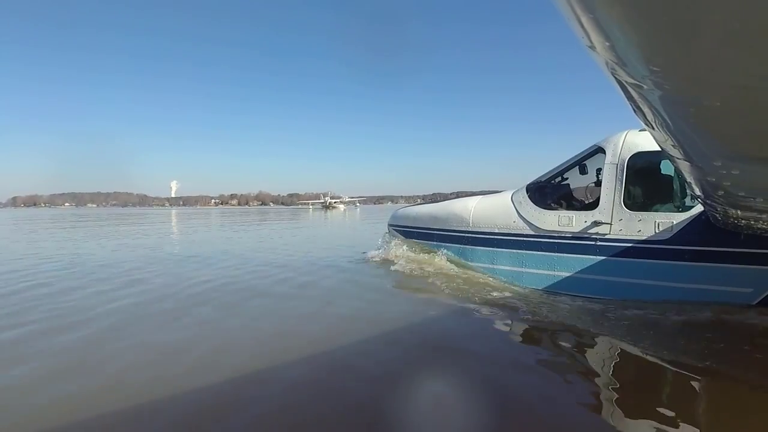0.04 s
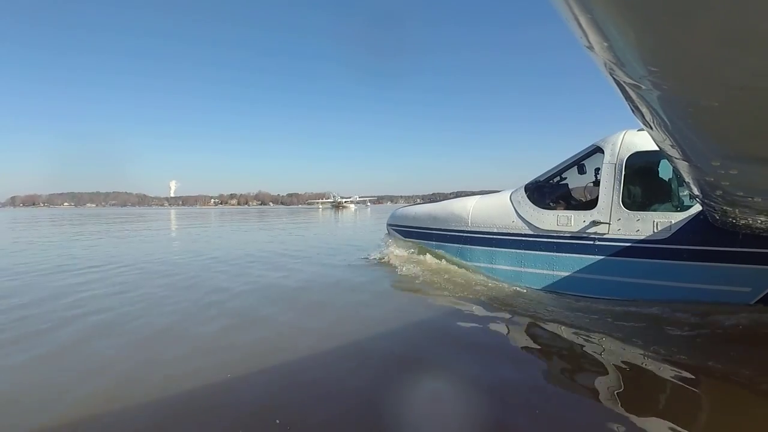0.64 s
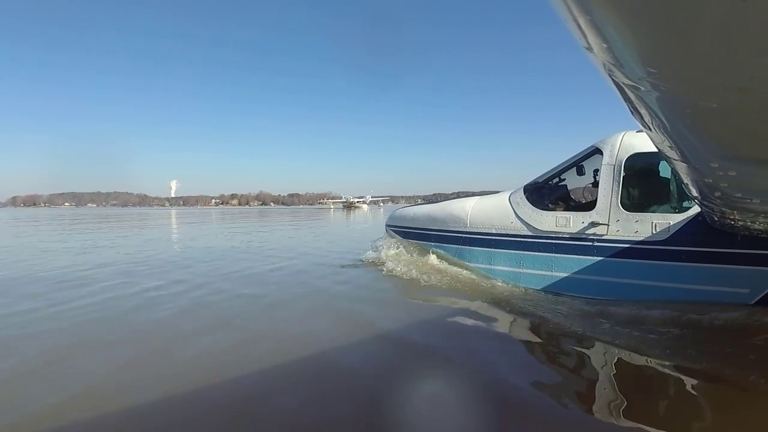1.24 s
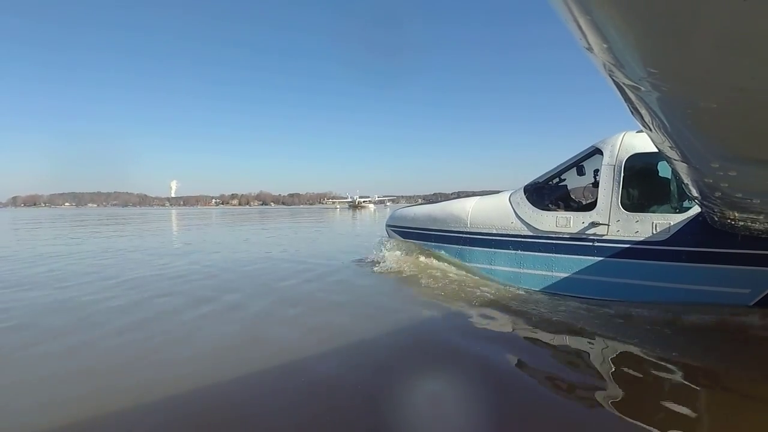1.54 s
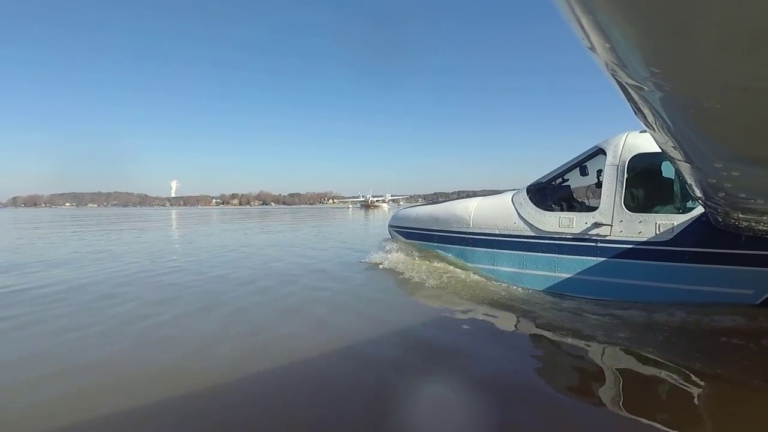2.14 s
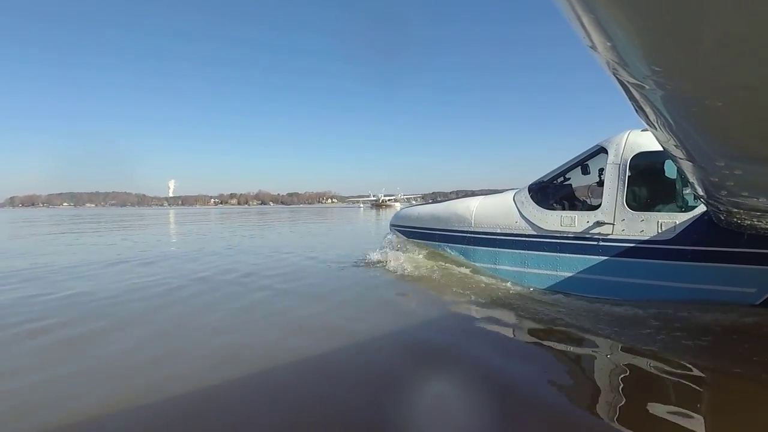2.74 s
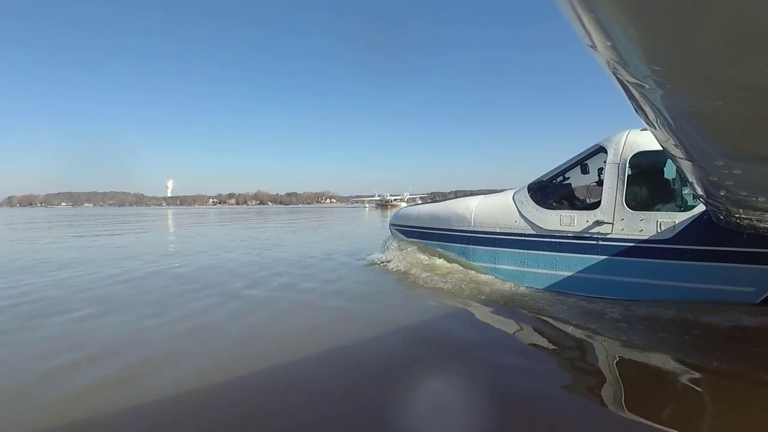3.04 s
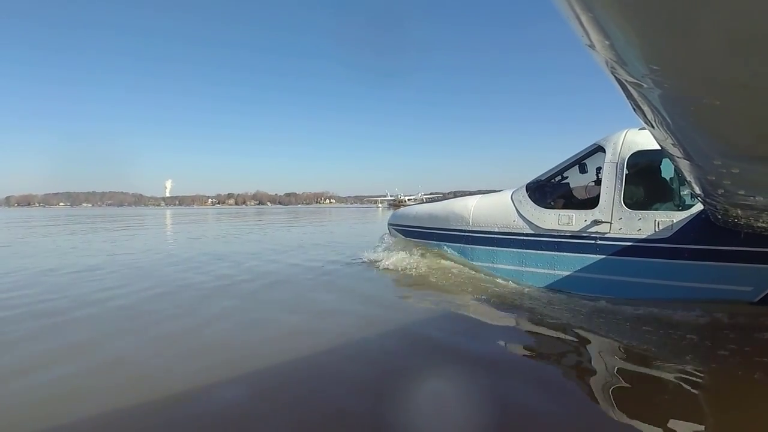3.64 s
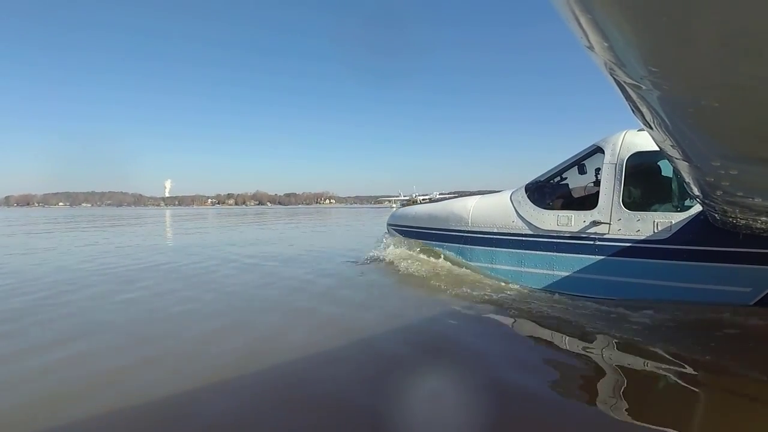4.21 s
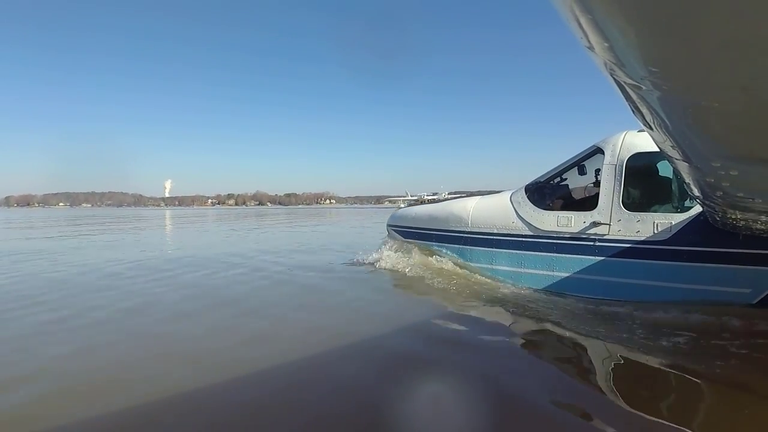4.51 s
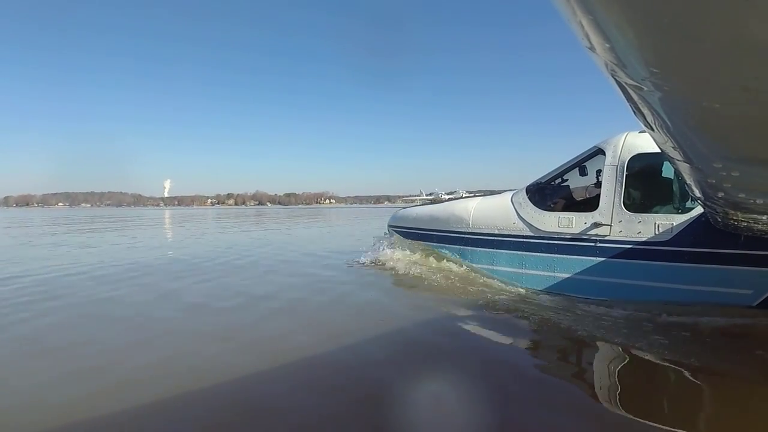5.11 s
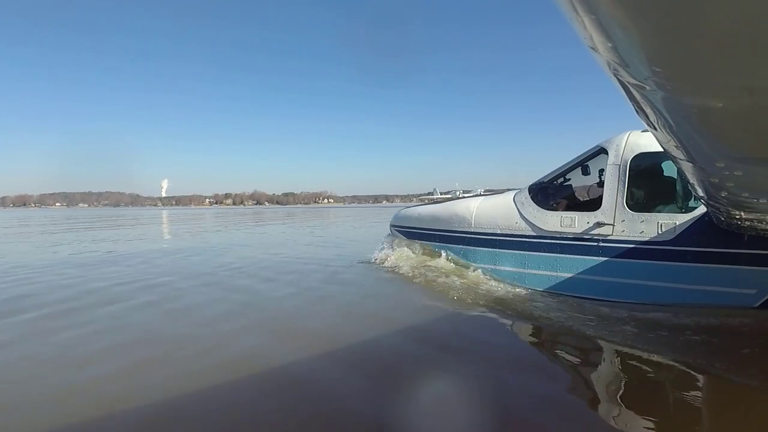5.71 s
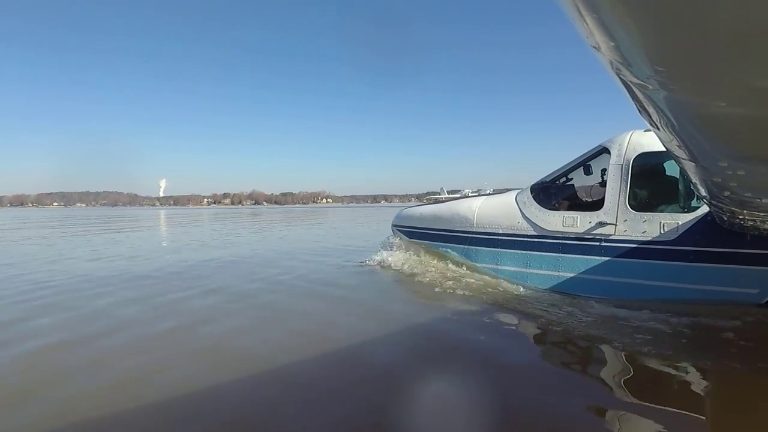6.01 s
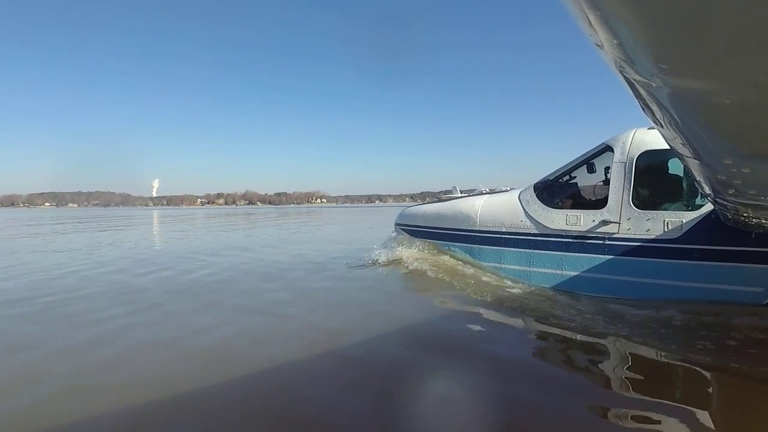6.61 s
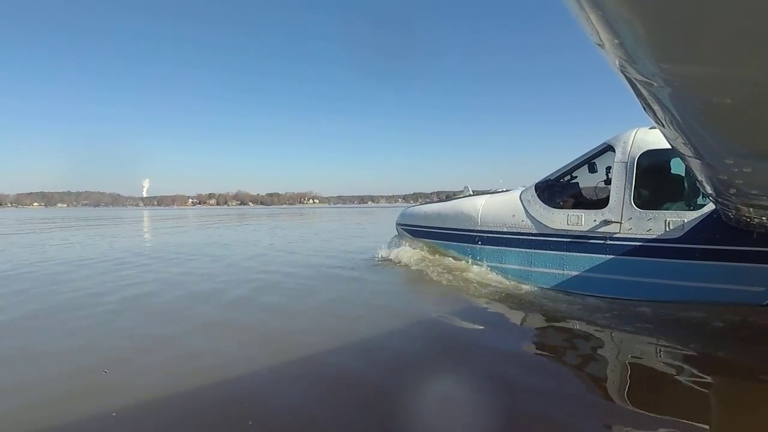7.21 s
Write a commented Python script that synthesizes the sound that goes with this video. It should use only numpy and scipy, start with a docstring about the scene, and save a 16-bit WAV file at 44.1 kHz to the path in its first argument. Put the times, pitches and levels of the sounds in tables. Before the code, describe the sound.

Close by, a seaplane's engine chugs at an even idle while the propeller beats the air. The low throb and rumble dominate from start to finish, with dry exhaust chuffs and a faint metallic hiss above them. Underneath, lake water bubbles against the moving hull and gives an occasional plop, swelling into a light splash just before the end. The microphone sits under the wing.

```python
"""A small seaplane's four-cylinder engine idles, heard from under the wing while taxiing across a lake.
The two-bladed propeller beats the air. Unequal cylinders make the engine lope; each gulps air, thumps
the silencer, rasps and spits a chuff that pings in the tailpipe, over rumble, ticks and metallic hiss.
The bow wave washes and bubbles along the hull, plops, gurgles and splashes up near the end."""
import sys
import numpy as np
from scipy import signal
from scipy.fft import rfft, irfft, next_fast_len
from scipy.io import wavfile
from scipy.ndimage import uniform_filter1d, map_coordinates

SR = 44100
rng = np.random.default_rng(int(sys.argv[2]) if len(sys.argv) > 2 else 0)


def wav_out(sig):
    """Save sig, one row per channel (or a flat mono array), as 16-bit PCM at SR to the path in sys.argv[1]."""
    wavfile.write(sys.argv[1], SR, np.round(np.clip(np.atleast_2d(sig).T, -1, 1) * 32767).astype(np.int16))


N = 324135


def amp(db):
    """Decibels to gain."""
    return 10 ** (np.asarray(db) / 20)


def unit(x):
    """x at rms 1."""
    return x / np.sqrt(np.mean(x ** 2) + 1e-20)


def wobble(rate_hz):
    """Smooth random curve, rate_hz knots a second."""
    knots = rng.standard_normal(int(N * rate_hz / SR) + 4)
    return map_coordinates(knots, [np.arange(N) * rate_hz / SR])


def swell(at_s, half_s):
    """Gaussian rise and fall."""
    return np.exp(-((np.arange(N) / SR - at_s) / half_s) ** 2)


def filtered(x, response):
    """x through a complex frequency response."""
    size = next_fast_len(N + SR // 2)
    return irfft(rfft(x, size) * response(np.fft.rfftfreq(size, 1 / SR)), size)[:N]


def coloured(x, spectrum):
    """x shaped by (f/Hz, level/dB) points on a log axis, rms 1."""
    hz, db = np.transpose(spectrum)
    return unit(filtered(x, lambda f: amp(np.interp(np.log(f + 1), np.log(hz), db))))


def noise(spectrum):
    """Coloured noise, rms 1."""
    return coloured(rng.standard_normal(N), spectrum)


def patchy(spectrum, depth_db):
    """Noise whose colour shifts from moment to moment, rms 1."""
    cells = signal.stft(rng.standard_normal(N), nperseg=512)[2]
    field = uniform_filter1d(rng.standard_normal(cells.shape), size=3, axis=0)
    field = uniform_filter1d(field, size=5, axis=1)
    mottled = signal.istft(cells * amp(depth_db * unit(field)), nperseg=512)[1]
    return coloured(mottled[:N], spectrum)


def body(f, modes):
    """Response of damped modes of alternating sign."""
    return sum((-1) ** k * amp(db) * 1j * f * width / (hz * hz - f * f + 1j * f * width)
               for k, (hz, width, db) in enumerate(modes))


def ringing(x, modes):
    """x through a set of modes."""
    return filtered(x, lambda f: body(f, modes))


def kicks(cycle, phase, db, scatter_db):
    """One impulse per engine cycle at this phase, scattered in size."""
    at = np.searchsorted(cycle, np.arange(-1, int(cycle[-1]) + 2) + phase)
    at = at[(at > 0) & (at < N)]
    return np.bincount(at, amp(db + scatter_db * rng.standard_normal(len(at))), N)


def puffs(impulses, rise_s, decay_s):
    """An envelope that swells and dies away after each impulse."""
    t = np.arange(SR // 10) / SR
    shape = (1 - np.exp(-t / rise_s)) ** 2 * np.exp(-t / decay_s)
    return signal.fftconvolve(impulses, shape / shape.max())[:N]


# Crankshaft: t/s, speed/rpm
SHAFT_SPEED = [(0.0, 939.2), (0.2, 937.2), (0.4, 943.4), (0.6, 944.7), (0.8, 936.5), (1.1, 943.5),
               (1.6, 949.3), (2.2, 948.3), (2.8, 944.3), (3.4, 943.5), (3.9, 942.9), (4.4, 935.5),
               (4.9, 947.4), (5.4, 944.0), (5.9, 948.5), (6.4, 949.2), (6.9, 949.1), (7.35, 959.4)]
def crankshaft():
    """Running count of engine cycles, two turns each."""
    rpm = np.interp(np.arange(N) / SR, *np.transpose(SHAFT_SPEED))
    return np.cumsum(rpm / 60 / 2) / SR - .053


# Blade-rate harmonics, from the first: level/dB
BLADE_HARMONICS = [-16, 1.5, -5.5, -36.5]
def propeller(cycle, lag_blades, unsteady_db):
    """Each passing blade leaves a smooth suction pulse: two blades, two turns a cycle."""
    blades = 2 * 2 * cycle - lag_blades
    return unit(-sum(amp(db + unsteady_db * wobble(16)) * np.cos(2 * np.pi * k * blades)
                     for k, db in enumerate(BLADE_HARMONICS, 1)))


# Cylinders in firing order: exhaust phase/cycle, level/dB, intake phase/cycle, level/dB
CYLINDER_PULSES = [(.96, 12.9, .923, 5.1), (.228, 13.4, .188, 16.2), (.478, 13.3, .393, 8.1),
                   (.772, 11.8, .667, 13.8)]
# Silencer and airbox modes: f/Hz, width/Hz, level/dB
SILENCER_MODES = [(93.2, 14, 2.8), (154, 14, 3.5), (202, 79, -12.6), (340, 19.6, -18.3)]
AIRBOX_MODES = [(143.9, 18, -1.1), (164, 19, 2.9)]
def lope(cycle, exhaust_db, intake_db, muffle_hz, scatter_db):
    """Even exhaust pulses ring the silencer, unequal gulps the airbox; together they chug once a cycle."""
    blows = sum(kicks(cycle, phase, db + exhaust_db, scatter_db) for phase, db, _, _ in CYLINDER_PULSES)
    gulps = sum(kicks(cycle, phase, db + intake_db, scatter_db) for _, _, phase, db in CYLINDER_PULSES)
    thumps = ringing(gulps, AIRBOX_MODES) - ringing(blows, SILENCER_MODES)
    return filtered(thumps, lambda f: 1 / (1 + (f / muffle_hz) ** 4))


# Exhaust valves: opening phase/cycle, chuff level/dB, rasp level/dB, knock phase/cycle, level/dB
EXHAUST_VALVES = [(.961, 3.2, 2, .945, 1), (.215, -12, -2, .207, -3.5), (.476, -1.5, 1, .452, 3),
                  (.712, 3.2, 0, .69, 0)]
# Cowling modes: f/Hz, width/Hz, level/dB
COWLING_MODES = [(280, 16, 1), (351, 7.6, -4.5), (574, 25, -4), (668, 29, 1.5), (707.6, 30, -3.5)]
# Gas in the pipe: f/Hz, level/dB
RASP_SPECTRUM = [(150, -19.5), (290, -1.5), (420, -2.5), (570, 0), (690, -1), (820, -5), (1120, -2),
                 (1380, -13), (1650, -8), (2200, -20.5), (5000, -24), (7500, -42), (8700, -29),
                 (12000, -47.5)]
def rasp(cycle, gas_db, cowling_db, knock_hz, scatter_db):
    """Each valve knocks the cowling as it lifts, then gas rasps through the pipe."""
    strokes = sum(kicks(cycle, phase, db, scatter_db) for phase, _, db, _, _ in EXHAUST_VALVES)
    lifts = sum(kicks(cycle, phase, db, scatter_db / 2) for _, _, _, phase, db in EXHAUST_VALVES)
    knocks = filtered(lifts, lambda f: 1 / (1 + 1j * f / knock_hz) ** 2)
    gas = unit(puffs(strokes, rise_s=0.0023, decay_s=0.025)) * patchy(RASP_SPECTRUM, depth_db=3.5)
    return amp(gas_db) * gas + amp(cowling_db) * unit(ringing(knocks, COWLING_MODES))


# Hard firings: t/s, level/dB
HARD_FIRINGS = [(.003, 10.5), (.1, 7), (.355, 6), (.388, 5.7), (.485, 4.5), (.738, 4.5), (.77, 5.7),
                (.863, 5.5), (1.152, 5), (1.374, 7), (1.658, 7), (1.91, 6), (2.005, 7.5), (2.164, 7),
                (2.29, 7.5), (2.385, 5.5), (2.638, 5.5), (2.672, 5.5), (3.022, 5.5), (3.18, 10),
                (3.307, 4.5), (3.816, 5), (4.165, 5.5), (4.422, 5), (4.454, 6.5), (4.71, 6), (4.804, 6),
                (4.932, 7.5), (5.059, 5), (5.186, 7), (5.218, 6), (5.597, 7.5), (5.723, 7), (5.82, 6),
                (6.483, 8), (6.611, 10.5), (6.737, 7.5), (6.863, 6), (7.209, 8.5), (7.335, 5.5)]
def gas_bursts(cycle, scatter_db):
    """One impulse as each exhaust valve opens; some firings bark harder."""
    bursts = sum(kicks(cycle, phase, db, scatter_db) for phase, db, _, _, _ in EXHAUST_VALVES)
    at = np.flatnonzero(bursts)
    for at_s, db in HARD_FIRINGS:
        nearest = at[np.argmin(np.abs(at - at_s * SR))]
        bursts[nearest] = amp(db)
    return bursts


# Turbulence: f/Hz, level/dB
RUMBLE_SPECTRUM = [(12, -19), (28, -7.5), (55, 1.5), (75, 0), (110, -4), (150, -11), (210, -7.5),
                   (300, -13), (400, -26.5), (900, -68)]
def rumble(flow):
    """Turbulent air and gas, pulsing with the exhaust flow."""
    return unit(1 + 0.29 * flow) * noise(RUMBLE_SPECTRUM)


# Exhaust puff: f/Hz, level/dB
CHUFF_SPECTRUM = [(150, -16), (400, 4.5), (700, -0.5), (900, -4.5), (1600, -3), (2800, -11.5), (3500, -1),
                  (4120, 7), (4700, -7), (6200, -11.5), (7500, -28), (8700, -12.5), (11000, -44),
                  (12500, -43)]
def chuffs(flow):
    """Each burst of gas leaves as a short puff of noise."""
    return flow * patchy(CHUFF_SPECTRUM, depth_db=3.5)


# Tailpipe modes: f/Hz, width/Hz, level/dB
TAILPIPE_MODES = [(700, 93, -8), (940, 77, -6.5), (1172, 100, -7.5), (1642, 75, -5.5), (2150, 88, -18.5),
                  (2460, 160, -13), (3040, 63, -19.5), (3565, 200, -8), (4046, 111, 4.5),
                  (4270, 210, -14.5), (4990, 110, -15.5)]
def tailpipe_pings(bursts, rise_s, decay_s):
    """Each burst of turbulent gas rings the tailpipe with a dry metallic ping."""
    at, t = np.flatnonzero(bursts), np.arange(SR // 10) / SR
    shape = (1 - np.exp(-t / rise_s)) ** 2 * np.exp(-t / decay_s)
    gas = shape * rng.standard_normal((len(at), len(t)))
    pings = irfft(rfft(gas) * body(np.fft.rfftfreq(len(t), 1 / SR), TAILPIPE_MODES), len(t))
    pings *= (bursts[at] / np.linalg.norm(pings, axis=1))[:, None]
    samples = at[:, None] + np.arange(len(t))
    return unit(np.bincount(samples.ravel(), pings.ravel(), N)[:N])


# Burst onset: f/Hz, level/dB
SNAP_SPECTRUM = [(600, -10), (1600, 10), (3000, 4), (4100, 15.5), (5600, -1), (7500, -15), (8900, -4.5),
                 (11000, -25), (12500, -27)]
def snaps(bursts, exponent):
    """Each burst starts with a bright snap, more prominent in hard firings."""
    envelope = unit(puffs(bursts ** exponent, rise_s=0.0017, decay_s=0.0027))
    return envelope * patchy(SNAP_SPECTRUM, depth_db=5.0)


# Hiss: f/Hz, level/dB
HISS_SPECTRUM = [(300, -20), (1000, -13.5), (2000, -12.5), (3200, -22.5), (3750, -12), (4020, 4),
                 (4500, -8), (5300, -21.5), (6500, -25.5), (7500, -42), (8500, -19.5), (10000, -35.5),
                 (12500, -50)]
def hiss(flutter_db):
    """Continuous metallic hiss with a fast flutter."""
    return amp(flutter_db * wobble(70)) * noise(HISS_SPECTRUM)


# Tappets: phase/cycle, level/dB
TAPPET_TICKS = [(.11, -11), (0.494, 3.5), (0.713, 2.5), (.968, 3)]
# Bright ring near 4 and 9 kHz: f/Hz, width/Hz, level/dB
BRIGHT_RING_MODES = [(4100, 200, -6), (8900, 300, -16.5)]
def tappets(cycle, ring_gain):
    """Tappets click with a short, bright ring."""
    taps = sum(kicks(cycle, phase, db, scatter_db=2.0) for phase, db in TAPPET_TICKS)
    cracks = puffs(taps, rise_s=0.00035, decay_s=0.0013) * rng.standard_normal(N)
    clicks = coloured(cracks, [(600, -10), (1600, 9.5), (3000, 9.5), (5500, -2), (7500, -14),
                               (8800, 4.5), (12000, -21)])
    return clicks + ring_gain * unit(ringing(cracks, BRIGHT_RING_MODES))


def engine():
    """One shaft times propeller, intake, exhaust and valves."""
    cycle = crankshaft()
    uneven = cycle + .001 * wobble(25)  # combustion is never quite on time
    bursts = gas_bursts(cycle, scatter_db=1.25)
    flow = unit(puffs(bursts, rise_s=0.005, decay_s=0.0052))
    return (amp(-34.5) * propeller(cycle, lag_blades=0.173, unsteady_db=0.3)
            + lope(uneven, exhaust_db=0.78, intake_db=0.9, muffle_hz=475, scatter_db=1.0)
            + rasp(uneven, gas_db=-61, cowling_db=-62, knock_hz=1300, scatter_db=2.0)
            + amp(-46.5) * rumble(flow)
            + amp(-68) * chuffs(flow)
            + amp(-64.5) * tailpipe_pings(bursts, rise_s=0.0025, decay_s=0.0044)
            + amp(-69) * snaps(bursts, exponent=1.3)
            + amp(-62.5) * hiss(flutter_db=2.0)
            + amp(-76.5) * tappets(cycle, ring_gain=0.3))


def bubbles(count, pitch_hz, log_spread, cycles, size_db):
    """Bubbles ring briefly and rise in pitch as they surface."""
    start, draw = rng.random((count, 2)).T
    hz = np.clip(pitch_hz * np.exp(log_spread * rng.standard_normal((count, 1))), 300, 11500)
    size = np.minimum(-np.log(1 - draw), 4)  # capped: no single bubble stands out
    t = np.arange(SR // 30) / SR
    age = t * hz / cycles
    envelope = amp(size_db * size)[:, None] * (1 - np.exp(-8 * age)) * np.exp(-2 * age)
    glide = 1 + 0.0734 * np.minimum(age, 3)
    grains = envelope * np.sin(2 * np.pi * hz * t * glide)
    samples = (start * N).astype(int)[:, None] + np.arange(len(t))
    return unit(np.bincount(samples.ravel(), grains.ravel(), N)[:N])


# Hull wash and fine spray: f/Hz, level/dB
WASH_SPECTRUM = [(150, 7), (400, 0), (680, 0.5), (850, -4), (1150, -6.5), (1400, -16), (2500, -10.5),
                 (4500, -17), (7000, -48), (12000, -55)]
SPRAY_SPECTRUM = [(2000, -14), (4100, 14), (5500, -3), (7500, -16), (8800, 2.5), (11000, -12.5),
                  (12500, -21.5)]
def bow_wave(wash_db, froth_db, spray_db, surge_db):
    """Bubbly water washes along the hull in small surges; fine spray crackles on top."""
    surge = amp(surge_db * wobble(7))
    froth = bubbles(count=700, pitch_hz=871, log_spread=0.38, cycles=12, size_db=2.0)
    crackle = bubbles(count=900, pitch_hz=7900, log_spread=0.38, cycles=2.4, size_db=3.5)
    spray = coloured(crackle, SPRAY_SPECTRUM)
    wash = patchy(WASH_SPECTRUM, depth_db=3.5)
    return surge * (amp(wash_db) * wash + amp(froth_db) * froth + amp(spray_db) * spray)


# Large bubbles: t/s, f/Hz, peak level/dB
LARGE_BUBBLES = [(1.22, 520, -61), (2.54, 509, -55), (3.03, 438, -56), (3.04, 568, -55), (3.41, 495, -56),
                 (4.0, 424, -52), (5.41, 464, -54), (5.52, 390, -51), (6.17, 605, -57), (6.745, 486, -50.5),
                 (6.92, 422, -53), (6.95, 449, -58)]
def plops(rise_s, decay_s, glide_per_s):
    """A large bubble swells, rings and rises in pitch as it nears the surface."""
    out, t = np.zeros(N + SR), np.arange(SR // 8) / SR
    shape = (1 - np.exp(-t / rise_s)) * np.exp(-t / decay_s)
    for at_s, hz, db in LARGE_BUBBLES:
        note = np.sin(2 * np.pi * hz * t * (1 + glide_per_s * t / 2))
        out[round(at_s * SR):][:len(t)] += amp(db) * shape / shape.max() * note
    return out[:N]


# Bow dips: t/s, half length/s, level/dB
BOW_DIPS = [(3.098, 0.16, -69), (5.502, 0.075, -71), (6.81, 0.5, -62.5)]
def gurgle():
    """The bow dips into a ripple and folds air under: a cluster of large, low bubbles."""
    envelope = sum(amp(db) * swell(at_s, half_s) for at_s, half_s, db in BOW_DIPS)
    return envelope * bubbles(count=700, pitch_hz=477, log_spread=.27, cycles=21, size_db=4.5)


def splash(at_s, half_s, level_db, patter_db):
    """The bow throws up a soft sheet of spray that patters back."""
    drops = bubbles(count=2400, pitch_hz=3020, log_spread=0.42, cycles=2.4, size_db=2.5)
    spray = coloured(.5 * drops + rng.standard_normal(N),
                     [(200, -23), (500, 5), (1200, -7), (2800, -10), (4200, 4.5), (5500, -11),
                      (7300, -22), (9000, -13), (12500, -34)])
    envelope = swell(at_s, half_s) + amp(patter_db) * swell(at_s + half_s, 2 * half_s)
    return amp(level_db) * envelope * spray


def scene():
    """Engine and water, mono."""
    water = (bow_wave(wash_db=-58.5, froth_db=-69, spray_db=-80, surge_db=1.2)
             + plops(rise_s=0.011, decay_s=0.014, glide_per_s=1.5)
             + gurgle()
             + splash(at_s=6.785, half_s=0.065, level_db=-61, patter_db=-10))
    return (engine() + water)[None]


def record(dry, top_hz=12400):
    """Brick-wall low-pass."""
    return np.array([filtered(channel, lambda f: f < top_hz) for channel in dry])


dry = scene()
out = record(dry)
wav_out(out)
```